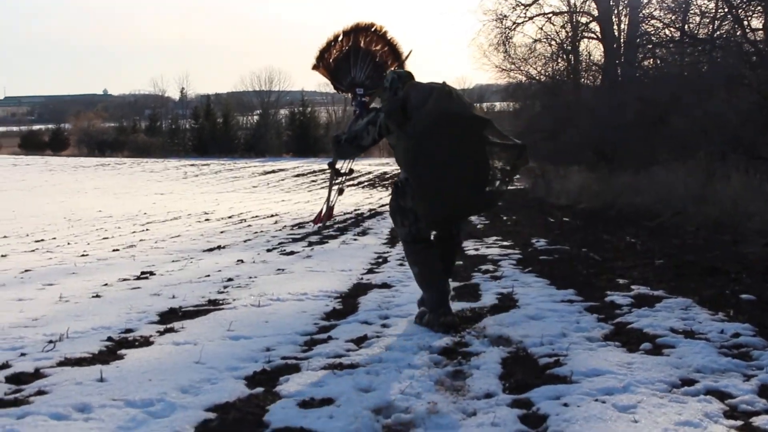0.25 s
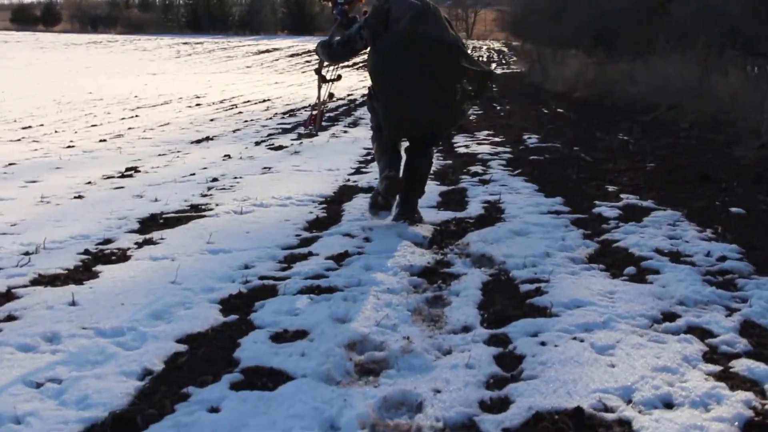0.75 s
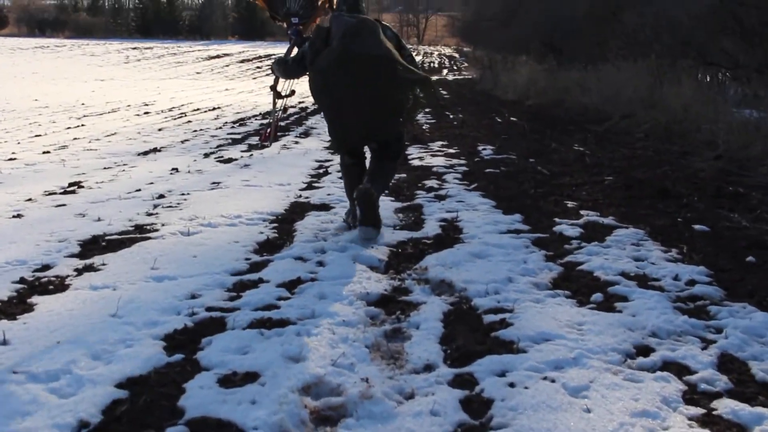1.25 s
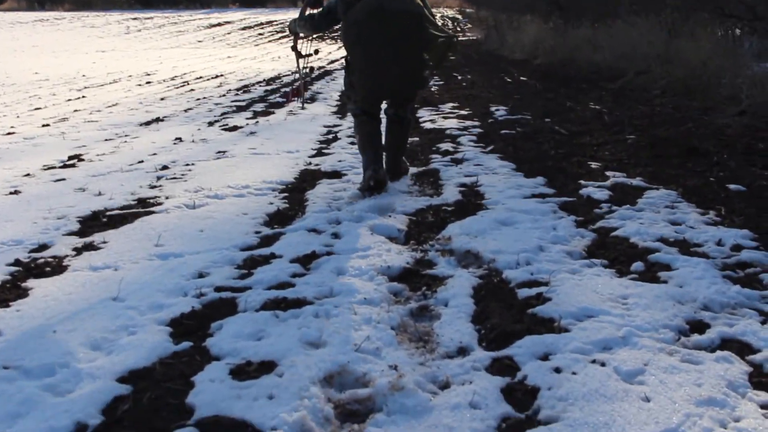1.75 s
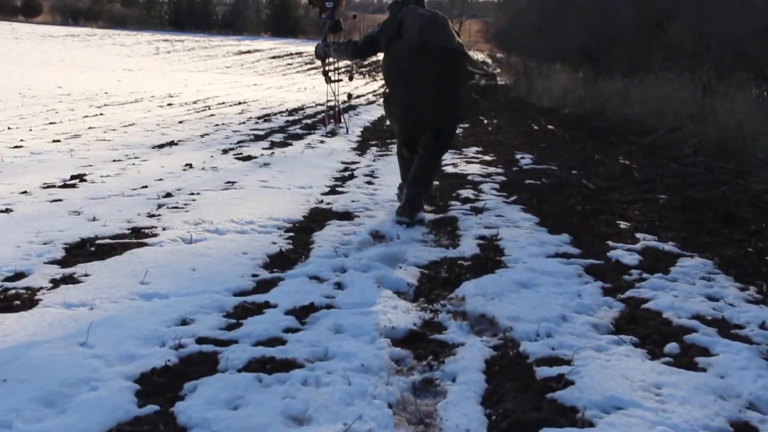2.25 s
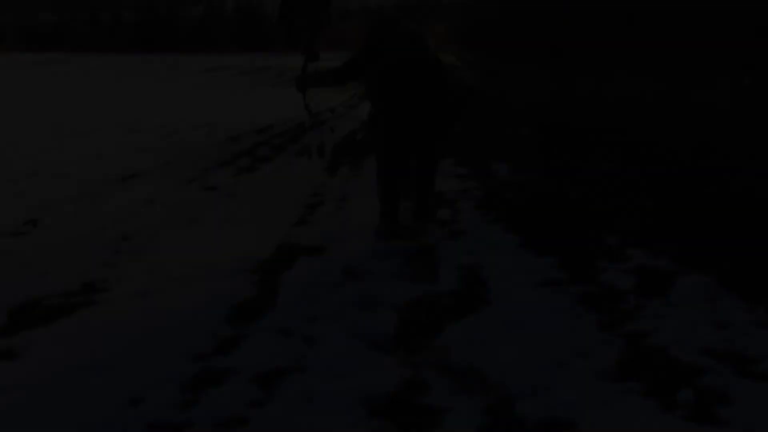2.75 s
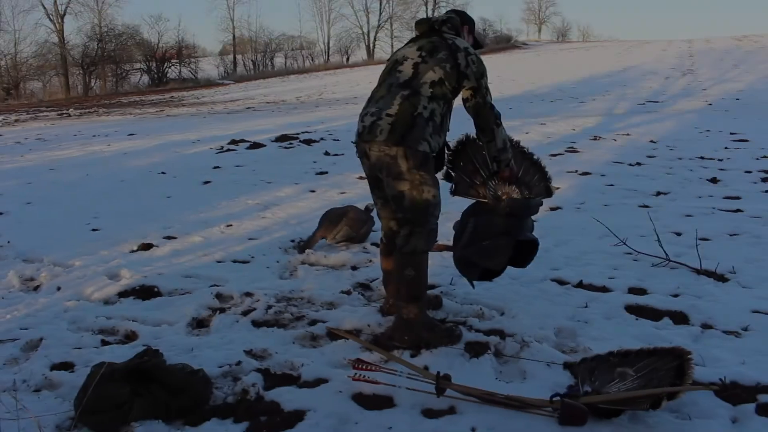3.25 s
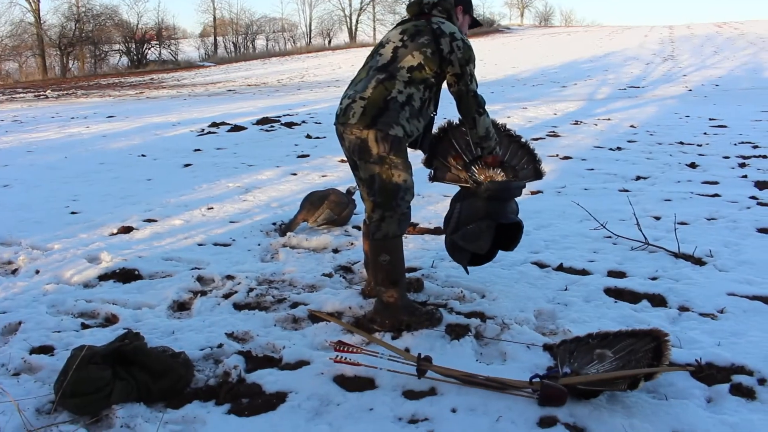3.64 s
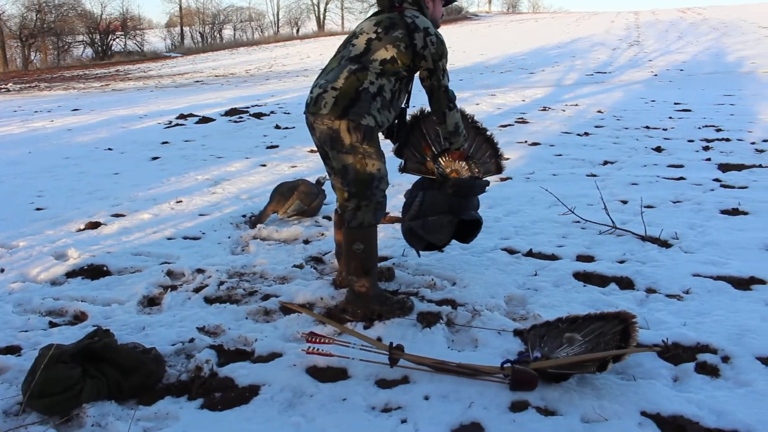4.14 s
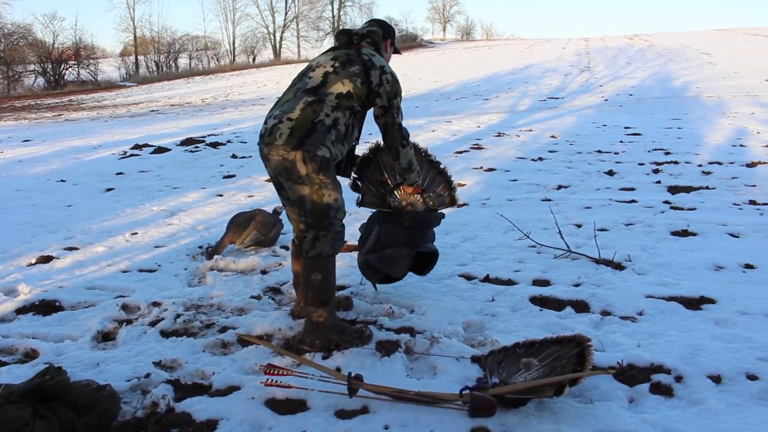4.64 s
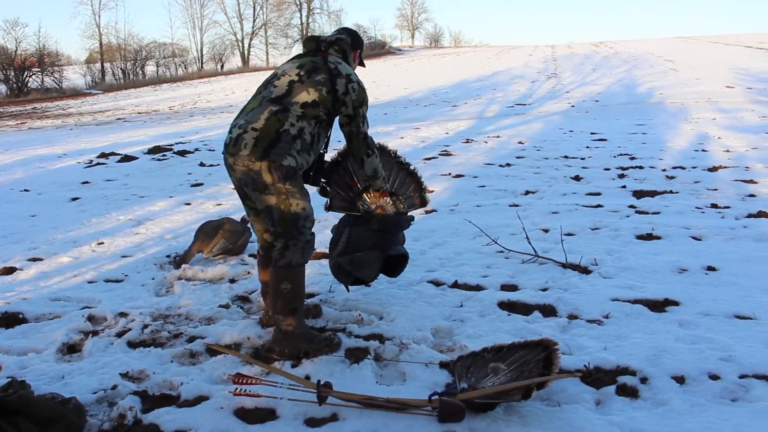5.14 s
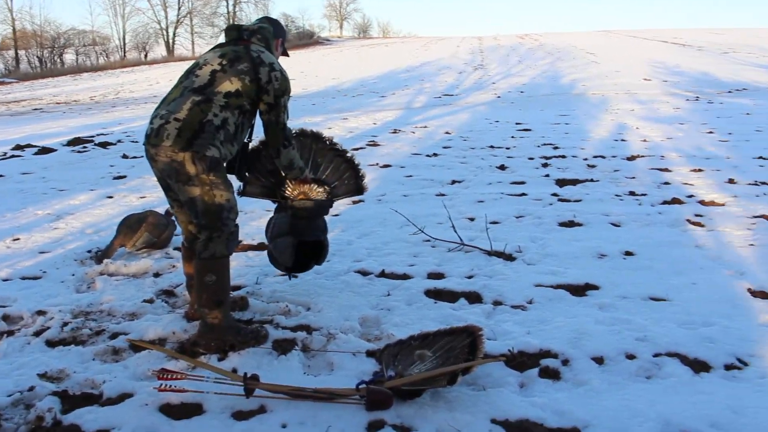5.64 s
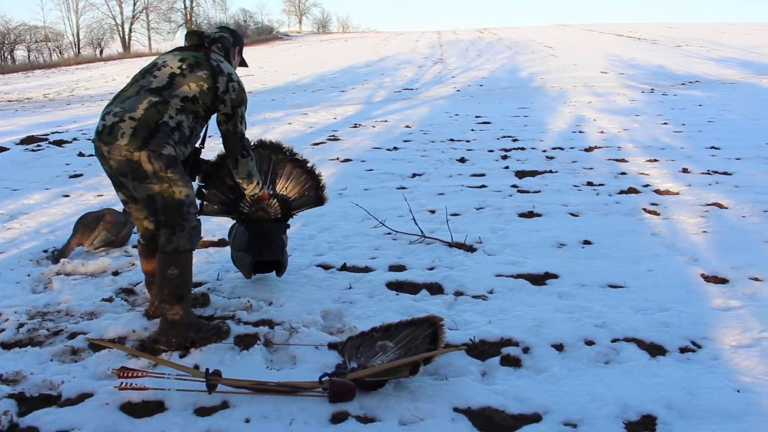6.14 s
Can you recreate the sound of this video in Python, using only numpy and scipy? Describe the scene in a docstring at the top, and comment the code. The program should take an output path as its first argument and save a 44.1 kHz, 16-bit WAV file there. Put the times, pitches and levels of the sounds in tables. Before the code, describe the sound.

Gusts buffet the microphone with a loud, low rumble in an open snowy field, while someone walks away with quiet dragging steps, snow crunches and a couple of clothing swishes. About halfway through, the wind fades to a soft hush with a faint distant road and small birds whistling and buzzing. Twice the camera is handled, giving short, close clusters of scrapes and hollow knocks.

```python
"""A snowy field in winter. Gusts push on the microphone and make it rumble, while someone walks off
with dragging boots, snow crunches and two bright swishes of clothing. The windy scene fades into a
calm one, with a soft hush and a far road. Small birds whistle and buzz in the hedge, with a short
echo from the trees. Twice the camera is handled: its mount scrapes and knocks, and its body rings."""
import sys
import numpy as np
from scipy import signal
from scipy.fft import rfft, irfft, next_fast_len
from scipy.io import wavfile
from scipy.ndimage import uniform_filter1d

SR = 44100
rng = np.random.default_rng(int(sys.argv[2]) if len(sys.argv) > 2 else 0)


def master(y):
    """Save y as 16-bit WAV."""
    cut = np.clip(np.atleast_2d(y).T, -1, 1)
    pcm = np.round(cut * 32767)  # scale
    wavfile.write(sys.argv[1], SR, pcm.astype(np.int16))


N = 282680
TIME = np.arange(N) / SR

# The tone of rubbing snow and clothing. Each row: frequency in Hz, level in dB.
RUB_TONE = [(800, -32), (1800, -3), (2600, 1), (3300, 6), (4400, -1), (6500, -3), (12500, -4.5),
            (15500, -18)]


def undb(db):
    """Turn decibels into a number to multiply by."""
    return 10 ** (np.asarray(db) / 20)


def unit(x):
    """Scale a signal to an average size (rms) of 1."""
    return x / np.sqrt(np.mean(x ** 2) + 1e-18)


def curve(rows):
    """Join rows of (seconds, value) with straight lines."""
    return np.interp(TIME, *np.transpose(rows))


def colour(x, points, tilt_db=0):
    """Give x the tone of (Hz, dB) points, tilted by tilt_db per octave, at an average size of 1."""
    hz, db = np.transpose(points)
    size = next_fast_len(len(x))
    f = np.maximum(np.fft.rfftfreq(size, 1 / SR), 1)
    gain_db = np.interp(np.log(f), np.log(hz), db + tilt_db * np.log2(hz / hz[0]))
    edge_fade = np.minimum(f / hz[0], 1) ** 2 * np.minimum(hz[-1] / f, 1) ** 2
    return unit(irfft(rfft(x, size) * undb(gain_db) * edge_fade, size)[:len(x)])


def noise(points, size=N):
    """Random noise with the tone of (Hz, dB) points."""
    return colour(rng.standard_normal(size), points)


def wander(rate):
    """A smooth random drift of about 1 either way, with rate new values a second."""
    hold = max(int(SR / rate), 1)
    steps = np.repeat(rng.standard_normal(N // hold + 1), hold)
    return unit(uniform_filter1d(uniform_filter1d(steps, hold), hold)[:N])


def grains(size, rate, spread_db):
    """Random clicks of uneven strength, about rate of them a second."""
    hits = (rng.random(size) < rate / SR) * rng.choice([-1, 1], size)
    return unit(hits * undb(spread_db * np.minimum(rng.exponential(size=size), 4)))


def burst(length, rise, fall):
    """A loudness shape that rises, holds until length, then fades; all in seconds."""
    t = TIME[:int((length + 6 * fall) * SR)]
    return (1 - np.exp(-t / rise)) * np.exp(-np.maximum(t - length, 0) / fall)


def add(out, start, x):
    """Mix x into out at start seconds."""
    i = int(start * SR)
    x, i = x[max(-i, 0):], max(i, 0)
    out[i:i + len(x)] += x[:max(N - i, 0)]


def air(calm_scene):
    """A breeze in far trees for the windy scene, and a soft hush that is louder in the calm one."""
    # The tones of the breeze and of still air. Each row: frequency in Hz, level in dB.
    breeze_tone = [(100, -30), (300, -1.5), (600, 5), (800, 4.5), (1100, -2), (1600, -13), (2300, -22),
                   (3200, -15), (4300, -28.5), (8000, -30), (15500, -32)]
    hush_tone = [(20, 1), (64, 2), (100, -5), (225, -2), (330, -4.5), (480, -6), (620, -11), (800, -11),
                 (1100, -18.5), (1600, -28), (2400, -27), (3250, -26.5), (4200, -36), (7000, -38.5),
                 (15500, -41)]
    # How loud the breeze is. Each row: time in seconds, level in dB.
    breeze_levels = [(0, -33), (.6, -36), (1.3, -35), (2.1, -34), (2.7, -33), (3.0, -38.5), (3.3, -40),
                     (3.7, -45), (4.2, -63), (6.41, -56)]
    breeze = noise(breeze_tone) * undb(curve(breeze_levels) + wander(24.96))
    hush = noise(hush_tone) * undb(-40 + 5 * calm_scene + .5 * wander(8))
    return breeze + hush


def far_road(whine_hz=745, drone_hz=232):
    """Tyres whine over a low drone; each is a narrow band of noise."""
    # How loud the road is. Each row: time in seconds, level in dB.
    road_levels = [(3.6, -53.5), (4.3, -37.5), (4.9, -42.5), (5.4, -52.5), (5.9, -44), (6.41, -71)]
    whine = signal.lfilter(*signal.iirpeak(whine_hz, 22, fs=SR), noise([(680, 0), (820, 0)]))
    drone = signal.lfilter(*signal.iirpeak(drone_hz, 6, fs=SR), noise([(200, 0), (280, 0)]))
    return (unit(whine) + unit(drone) * undb(-1)) * undb(curve(road_levels))


def whistle(hz, db, quaver_hz=30):
    """One soft-edged bird note that follows a slightly shaky pitch."""
    hz = hz + quaver_hz * wander(230)[:len(hz)]
    tone = np.sqrt(2) * np.sin(2 * np.pi * np.cumsum(hz) / SR)
    return tone * signal.windows.tukey(len(hz), .65) * undb(db)


def birds(chip_drop=0.213, pip_s=0.054, upper_hz=3300, lower_hz=3030):
    """Small birds sing swoops, chips, pips and thin two-toned buzzes."""
    # Falling whistles that turn upward if they last. Each row: start, length and time to the turn
    # in seconds, first pitch and pitch at the turn in Hz, level in dB.
    swoops = [(-.03, 0.095, 0.12, 3100, 2390, -51), (2.043, 0.11, .14, 3650, 2460, -53),
              (4.102, 0.13, 0.061, 3380, 2833, -47.5), (5.194, 0.078, .15, 3760, 2260, -39.5),
              (6.233, .092, 0.1, 3450, 2790, -50)]
    # Notes that arch up and down. Each row: start and length in seconds, top pitch in Hz, level in dB.
    chips = [(.048, .019, 3050, -47), (2.543, .054, 2610, -48), (4.684, 0.05, 2940, -45),
             (5.309, 0.0205, 3260, -45), (5.69, 0.049, 2600, -48.5)]
    # Notes on one pitch. Each row: start in seconds, pitch in Hz, level in dB.
    pips = [(.066, 2385, -48.5), (2.163, 2350, -45), (3.725, 2250, -53.5), (4.23, 2530, -51),
            (5.32, 2235, -50.5), (5.785, 2195, -46)]
    # Buzzes. Each row: start and length in seconds, level in dB.
    buzzes = [(4.58, .13, -55.5), (4.87, 0.34, -55.5), (5.416, 0.099, -51.5)]
    out = np.zeros(N)
    for start, length, turn, first_hz, low_hz, db in swoops:
        swoop = (1 - TIME[:int(length * SR)] / turn) ** 2
        add(out, start, whistle(low_hz + (first_hz - low_hz) * swoop, db))
    for start, length, top_hz, db in chips:
        arch = 1 - chip_drop * np.linspace(-1, 1, int(length * SR)) ** 2
        add(out, start, whistle(top_hz * arch, db))
    for start, hz, db in pips:
        add(out, start, whistle(np.full(int(pip_s * SR), hz), db))
    upper = np.sin(2 * np.pi * np.cumsum(upper_hz + 24 * wander(300)) / SR)
    lower = np.sin(2 * np.pi * np.cumsum(lower_hz + 24 * wander(300)) / SR)
    buzz = unit(upper + .55 * lower)
    for start, length, db in buzzes:
        shape = signal.windows.tukey(int(length * SR), 0.21)
        add(out, start, buzz[int(start * SR):][:len(shape)] * shape * undb(db))
    return out


def tree_echo(song, echo_db=-4, fade_s=.28):
    """Trees scatter the song, adding an echo that drops 60 dB in fade_s."""
    t = TIME[:SR // 2]
    scatter = rng.standard_normal(len(t)) * np.exp(-np.log(1000) * t / fade_s)
    return song + undb(echo_db) * signal.fftconvolve(song, scatter / np.linalg.norm(scatter))[:N]


def crunch_or_swish(length, db, tilt_db, growth_db=1.5):
    """A growing burst of tiny clicks: a crunch of snow or a swish of clothing."""
    shape = burst(length, rise=0.0011, fall=0.0064)
    growth = undb(growth_db * (np.minimum(TIME[:len(shape)] / length, 1) - .5))
    return colour(grains(len(shape), 6000, 1.5), RUB_TONE, tilt_db) * shape * growth * undb(db)


def footsteps(settle_s=0.066, crumbs_per_s=5):
    """Snow grains rub as the boots drag, then settle; now and then snow crunches or clothing swishes."""
    # Boots dragging. Each row: start, rise time and length of the push in seconds, level in dB.
    strides = [(.39, .08, 0.094, -42.5), (.607, .005, 0.045, -51), (.70, 0.016, 0.1, -52),
               (1.025, 0.0039, 0.069, -43.5), (1.13, 0.017, .21, -48), (1.39, 0.011, 0.13, -52.5),
               (1.668, 0.0076, 0.074, -46), (1.77, 0.014, 0.15, -53), (2.24, 0.054, 0.072, -43),
               (2.48, 0.021, 0.061, -48)]
    # Snow crunches and two bright swishes of clothing (at 0.205 and 2.774 seconds).
    # Each row: start and length in seconds, level in dB, tone tilt in dB per octave.
    crunches_and_swishes = [(0.205, 0.029, -38.5, 3.5), (0.603, 0.041, -40.5, -8.5),
                            (0.753, 0.011, -43, -17), (1.216, 0.03, -39, -5.5), (1.866, 0.023, -42.5, -7),
                            (1.905, 0.0082, -39.5, -5), (2.203, .0095, -44, -4.5),
                            (2.282, 0.037, -43.5, -12), (2.689, 0.0079, -47, 4), (2.729, 0.016, -43, -1.5),
                            (2.774, 0.039, -36.5, 0), (3.092, 0.088, -41.5, -6),
                            (3.146, 0.034, -39.5, -2.5), (3.213, 0.033, -43, -6.5), (5.227, .03, -49, -3.5)]
    drag_power = np.zeros(N)
    for start, rise, length, db in strides:
        add(drag_power, start, (burst(length, rise, settle_s) * undb(db)) ** 2)
    rubbing = colour(grains(N, 5000, 0.91), RUB_TONE, tilt_db=-0.3)
    out = rubbing * np.sqrt(drag_power) * undb(2 * wander(90))
    for start, length, db, tilt_db in crunches_and_swishes:
        add(out, start, crunch_or_swish(length, db, tilt_db))
    for start, _, length, _ in strides:  # each stride may also crunch one small crumb of snow
        chance, when, size = rng.random(3)
        crumb = crunch_or_swish(0.0098 * (.5 + size), db=-49.5, tilt_db=-3)
        add(out, start + when * length, crumb * (chance < crumbs_per_s * length))
    return out


def body_ring(favoured_hz, focus_db):
    """The camera rings after one push; its notes lose focus_db per octave away from favoured_hz."""
    # Notes of the body and mount. Each row: pitch in Hz, width in Hz (wider dies sooner), level in dB.
    notes = [(201, 67, -9), (302, 41, -5.5), (368, 61, 1), (439, 120, 4.5), (837.4, 29.3, -5.5),
             (940, 61, -3.5), (1360, 110, -23), (1600, 57, -22), (1800, 70, -34), (1840, 40, -14),
             (1870, 61, -10), (2138, 39, -6.5), (3130, 160, -34), (3530, 73, -22)]
    t = TIME[:SR // 8]
    ring = np.zeros(len(t))
    for hz, width, db in notes:
        gain = undb(db - focus_db * abs(np.log2(hz / favoured_hz)))
        ring += gain * np.sin(2 * np.pi * hz * t) * np.exp(-np.pi * width * t)
    return ring


def camera_handling(tick_db=-23, lowest_hz=120):
    """The mount scrapes in short runs of tiny catches and knocks as it slides into place."""
    # Knocks on the body. Each row: start in seconds, strength in dB, favoured pitch in Hz.
    knocks = [(4.775, -10.5, 413), (4.828, -10, 302), (4.840, -7, 330), (4.869, -5.5, 363),
              (6.154, -10, 840), (6.168, -5, 435), (6.174, -6, 835), (6.2209, -7, 372), (6.230, -5, 370),
              (6.264, -13, 516), (6.345, -7, 197)]
    # The mount sticking and slipping. Each row: start and length in seconds, ring level in dB,
    # favoured pitch in Hz, rasp level in dB.
    scrapes = [(4.724, 0.013, -37, 600, -34), (4.741, .02, -24.5, 513, -25.5), (4.77, 0.032, -24, 300, -30),
               (4.825, 0.02, -22.5, 420, -24), (4.86, .0047, -27, 400, -28.5), (6.15, 0.032, -16, 810, -22),
               (6.222, .04, -23, 463, -31), (6.294, 0.028, -29, 600, -35), (6.323, 0.013, -27, 900, -15.5),
               (6.363, 0.021, -25, 250, -25.5)]
    # The dry rasp of parts touching. Each row: frequency in Hz, level in dB.
    rasp_tone = [(150, -16), (350, 4), (800, 3.5), (1200, 0), (1650, -3), (2400, -3), (3500, -7),
                 (4800, -15), (7000, -22.5), (11000, -25.5), (15500, -31)]
    out = np.zeros(N)
    for start, db, favoured_hz in knocks:
        ring = body_ring(favoured_hz, focus_db=23.5)
        ring *= 1 - np.exp(-TIME[:len(ring)] / 0.0018)  # soft contact
        add(out, start, ring / np.abs(ring).max() * undb(db))
        contact = burst(0.0023, rise=0.00033, fall=0.0062)
        add(out, start, noise(rasp_tone, len(contact)) * contact * undb(db + tick_db))
    for start, length, ring_db, favoured_hz, rasp_db in scrapes:
        shape = burst(length, rise=0.0015, fall=0.013)
        slips = grains(len(shape), 7000, 5.0)
        ring = signal.fftconvolve(slips * shape, body_ring(favoured_hz, focus_db=4))
        ring *= np.sqrt(np.sum(shape ** 2) / np.sum(ring ** 2))  # as much energy as the shape
        add(out, start, ring * undb(ring_db))
        add(out, start, colour(slips, rasp_tone) * shape * undb(rasp_db))
    # the handling sounds carry no deep bass
    return signal.sosfilt(signal.butter(2, lowest_hz, "high", fs=SR, output="sos"), out)


def wind_on_microphone():
    """Big swirls of air shove the microphone; small ones flutter on top, over a deep rumble."""
    # The gusts. Each row: time in seconds, strength in dB.
    gusts = [(0.03, -14.5), (0.25, -9), (0.36, -14), (0.45, -10), (0.47, -19), (0.5, -12), (0.61, -16),
             (0.84, -10.5), (0.89, -15), (1.06, -10), (1.09, -15), (1.43, -15.5), (1.48, -8.5), (1.57, -18),
             (1.6, -11), (1.7, -21.5), (1.96, -14.5), (2.04, -18), (2.08, -16), (2.24, -26.5), (2.27, -17),
             (2.39, -26.5), (2.48, -20), (2.52, -25), (2.61, -14.5), (3.03, -22.5), (3.3, -33.5)]
    # The tones of the big and the small swirls. Each row: frequency in Hz, level in dB.
    shove_tone = [(20, -9), (40, 1.5), (70, -2), (95, 1.5), (120, 1.5), (160, -7), (210, -14), (300, -29.5),
                  (600, -48)]
    flutter_tone = [(130, -9), (185, 0.5), (235, -5.5), (300, -11.5), (450, -26.5), (900, -42)]
    gust_db = curve(gusts) + wander(14)
    pressure = noise(shove_tone)
    pressure /= np.sqrt(uniform_filter1d(pressure ** 2, int(.06 * SR)))  # even out its loudness
    shoves = pressure * undb(gust_db - 1)
    crests = unit(2.1 + np.abs(pressure))  # flutter is strongest at the top of each shove
    flutter = noise(flutter_tone) * crests * undb(-9 + 1.238 * gust_db + 1.5 * wander(39.27))
    rumble = noise([(25, 0), (60, 0)]) * undb(-17 + 0.56 * gust_db)  # eases less between gusts
    fade_out = np.interp(TIME, [3.1, 3.28], [1, 0])
    return (shoves + flutter + rumble) * fade_out


def scene():
    """All the sounds in one channel; the windy scene fades into the calm one."""
    calm_scene = np.interp(TIME, [2.4, 3.6], [0, 1])
    outdoors = wind_on_microphone() + air(calm_scene) + far_road() * calm_scene
    return (outdoors + footsteps() + tree_echo(birds()) + camera_handling())[None]


def record(dry, top_hz=15750):
    """The camera rounds off the biggest peaks and cuts the highest treble."""
    rounded = dry / (1 + dry ** 6) ** (1 / 6)
    return signal.sosfilt(signal.ellip(10, .2, 80, top_hz, fs=SR, output="sos"), rounded)


dry = scene()
out = record(dry)
master(out)
```